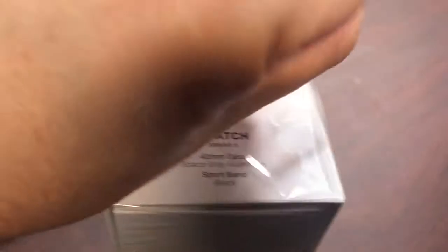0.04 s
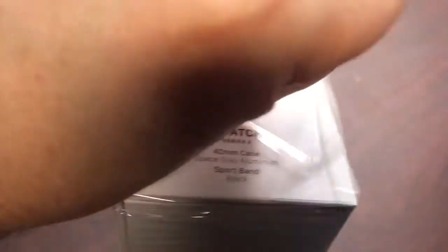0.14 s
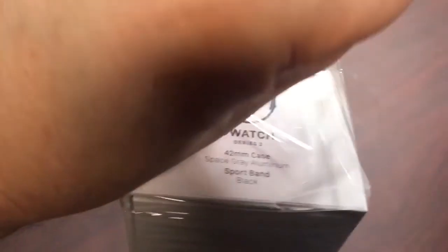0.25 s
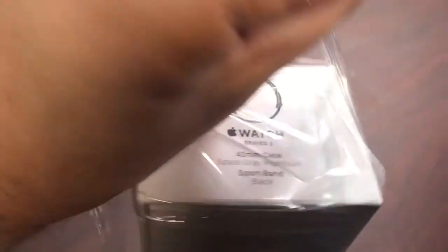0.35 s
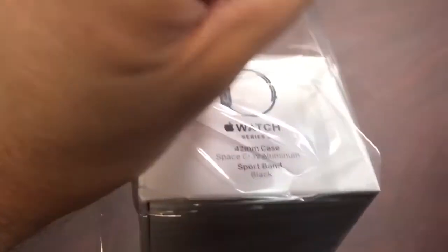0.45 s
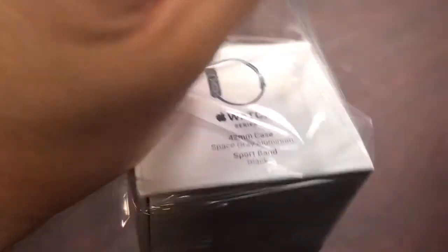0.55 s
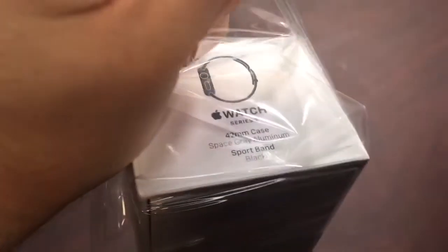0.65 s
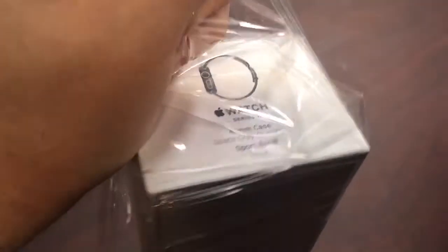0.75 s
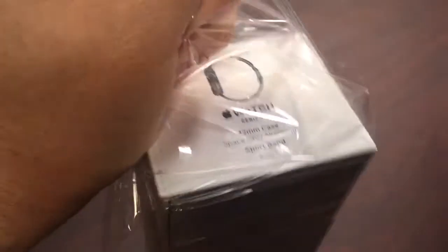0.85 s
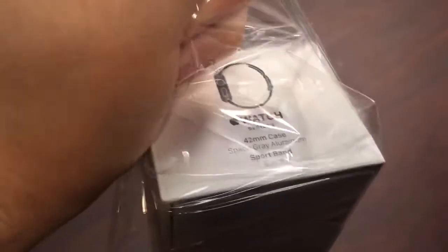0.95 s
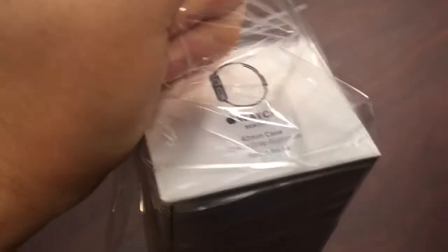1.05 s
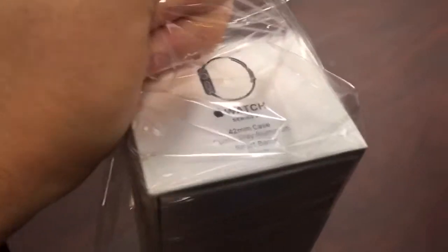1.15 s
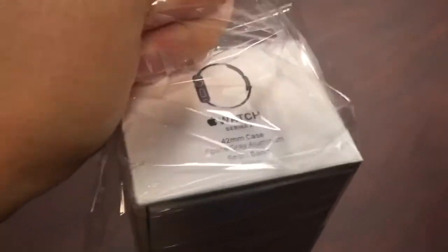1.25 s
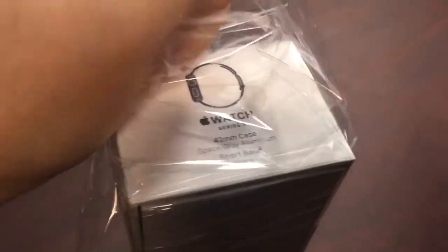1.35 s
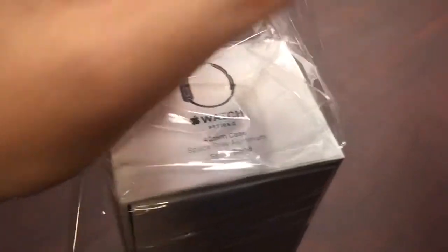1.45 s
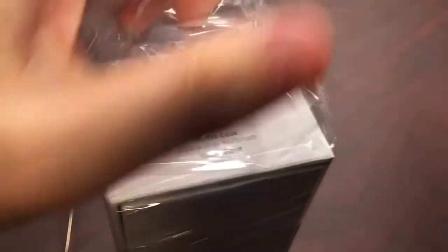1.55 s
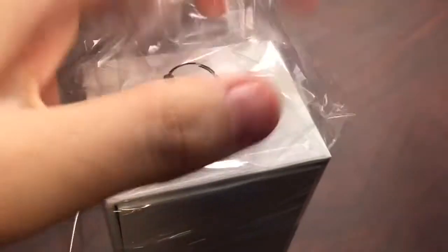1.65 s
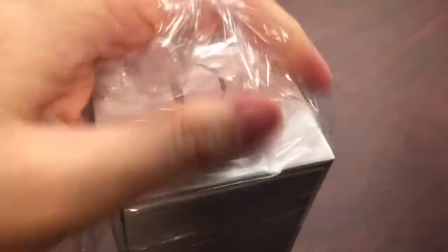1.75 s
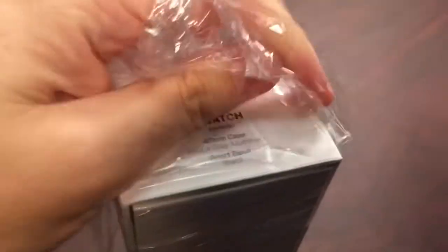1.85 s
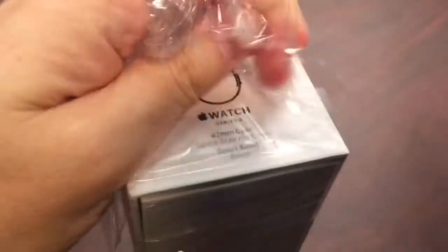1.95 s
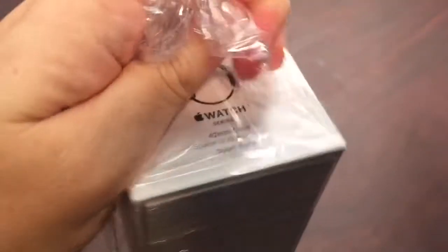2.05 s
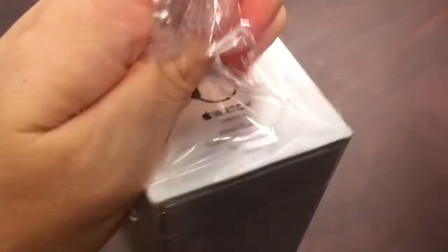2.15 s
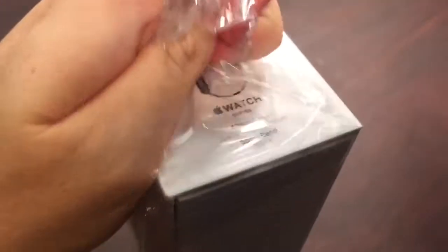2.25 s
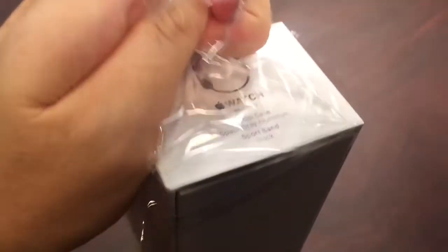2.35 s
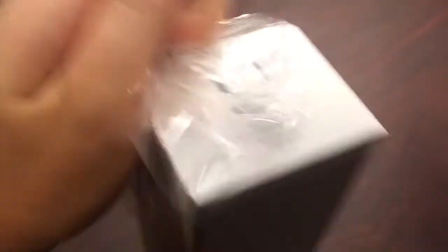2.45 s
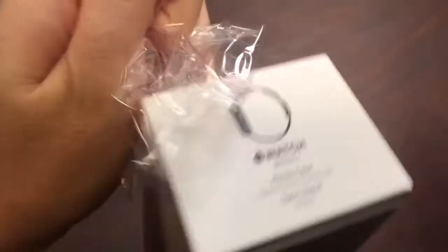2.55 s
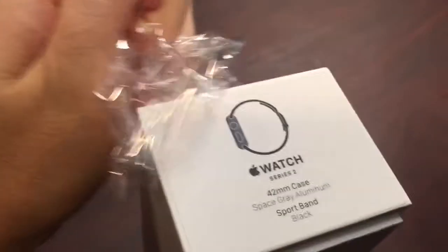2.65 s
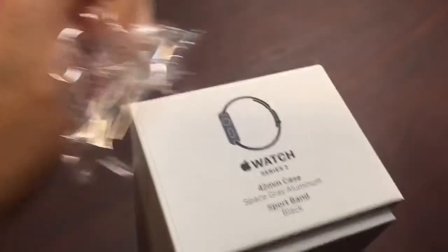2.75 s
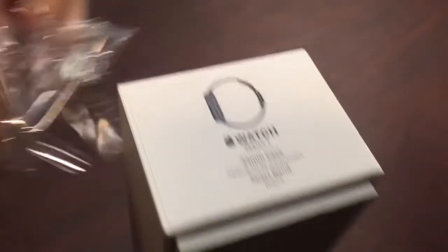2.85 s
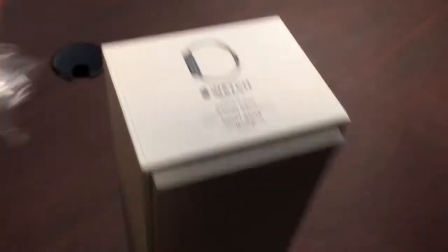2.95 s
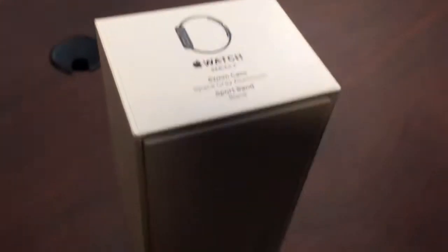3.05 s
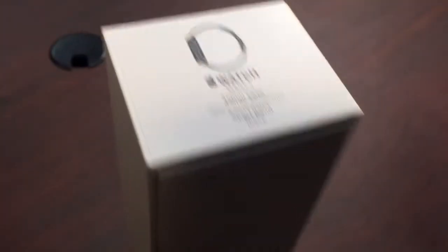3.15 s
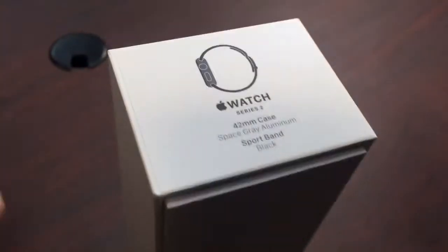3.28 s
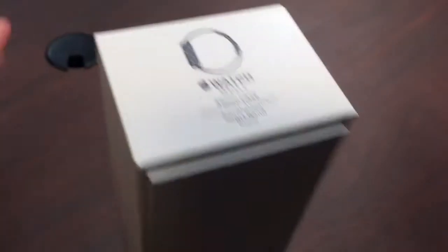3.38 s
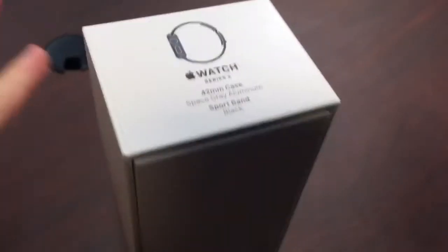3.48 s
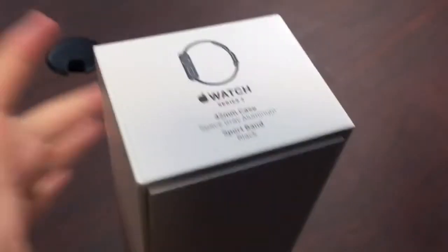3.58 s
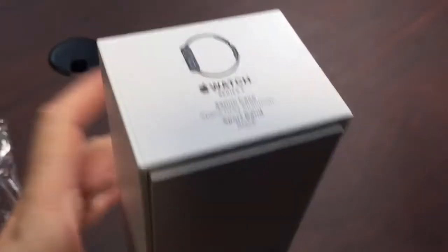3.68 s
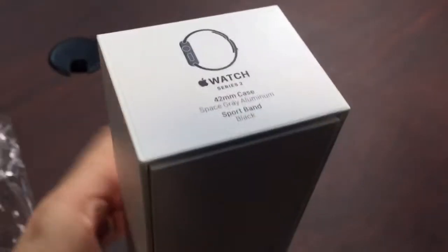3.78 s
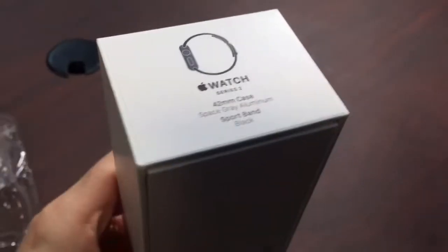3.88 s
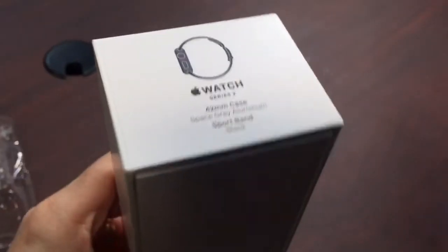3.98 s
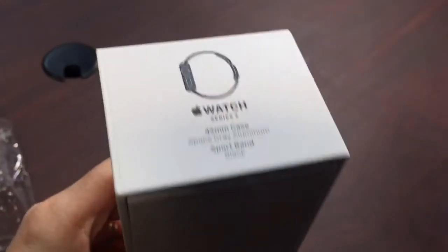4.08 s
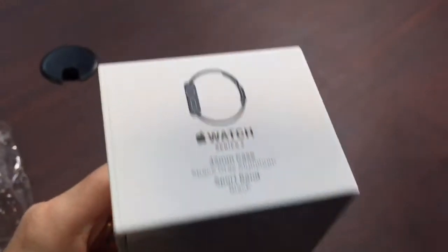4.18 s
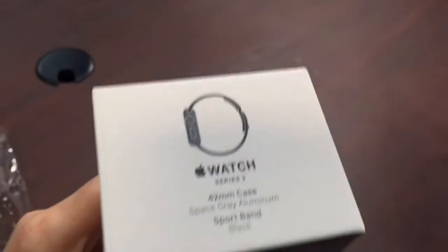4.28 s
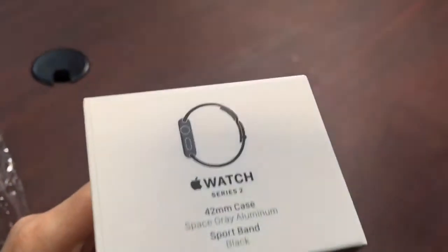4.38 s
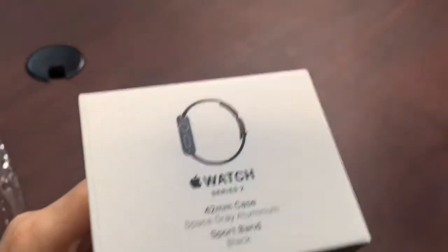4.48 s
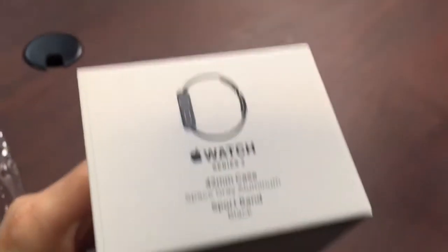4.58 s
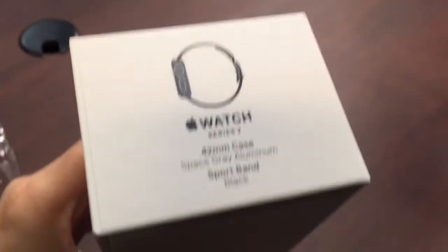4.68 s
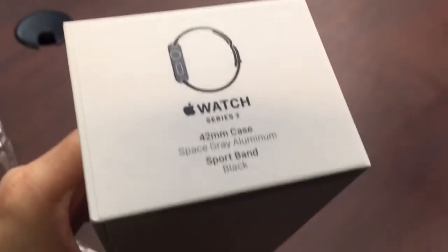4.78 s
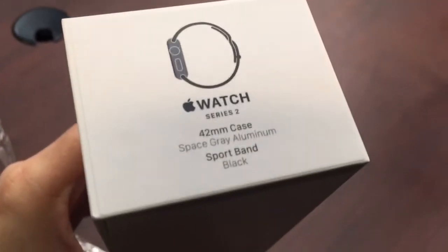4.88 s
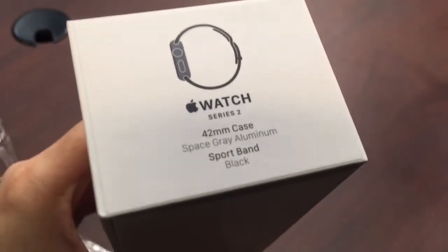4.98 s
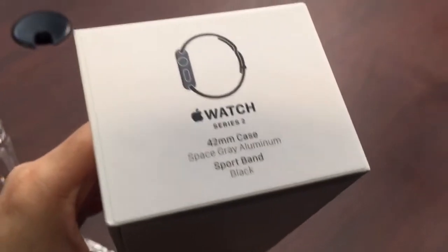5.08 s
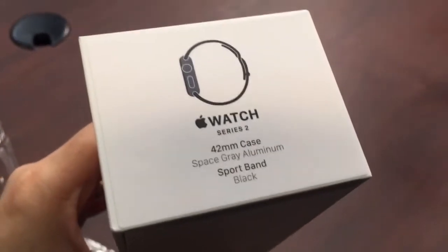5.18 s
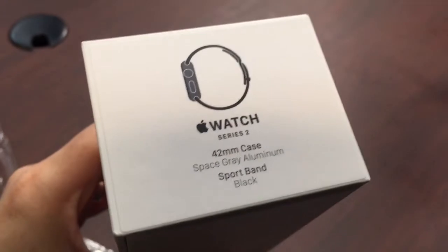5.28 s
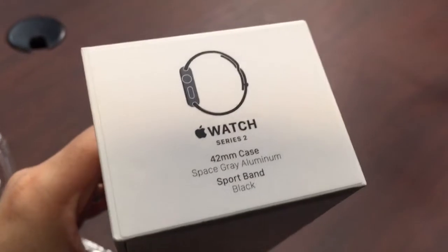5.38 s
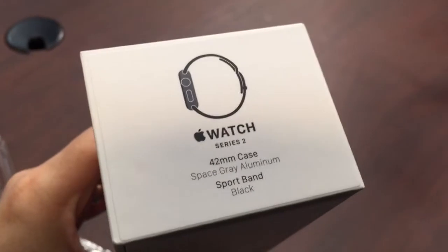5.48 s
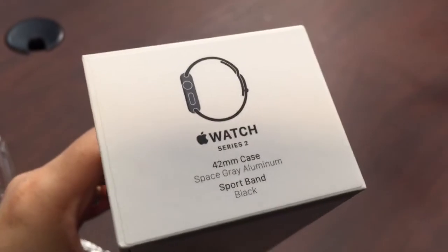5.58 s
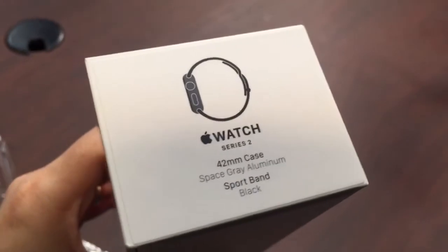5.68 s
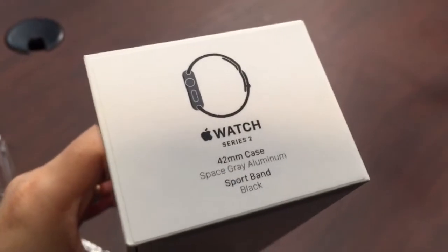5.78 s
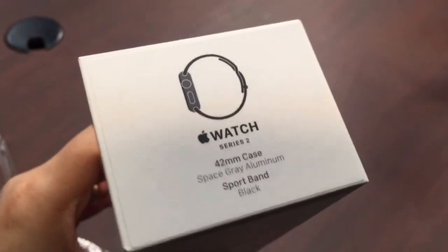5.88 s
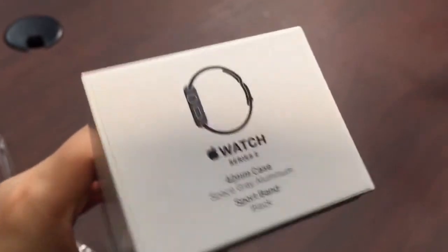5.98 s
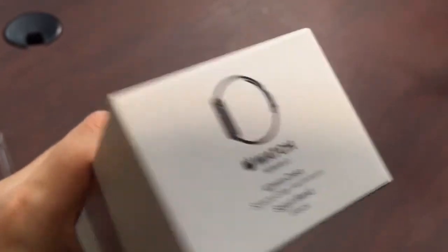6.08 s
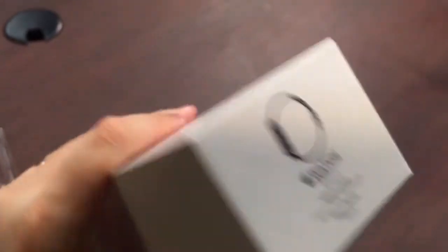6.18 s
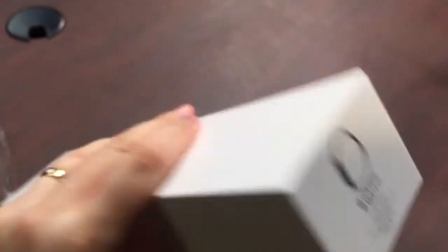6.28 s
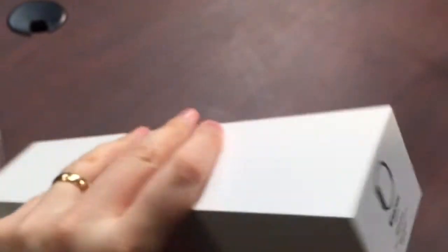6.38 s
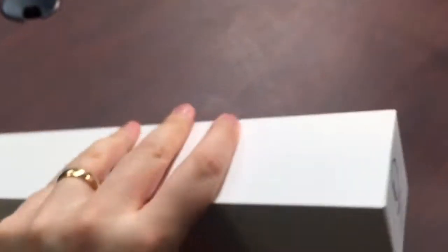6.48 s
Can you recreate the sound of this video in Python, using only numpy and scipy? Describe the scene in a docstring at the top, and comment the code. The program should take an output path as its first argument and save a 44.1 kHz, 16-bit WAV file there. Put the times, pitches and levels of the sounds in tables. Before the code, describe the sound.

Bright bursts of crinkling film and hard little snaps come first, with muffled cardboard thuds beneath. They ease, then intensify until the wrap cracks free with a flap and a low puff. Loose plastic rustles while the box rocks to rest. Near quiet follows, with light finger brushing and faint squeaks over room rumble, then a raspy, juddering slide. Close microphone, small indoor room.

```python
"""In a small, quiet room with ventilation rumble, shrink wrap is peeled off a cardboard box, close by: bursts
of noise snap one by one over fine crinkling made of random grains, while ringing tones give the box's knocks.
The film then lets go with a loud pop: a crack, a flap and a low push of air. Softer snaps follow as the wrap
is put aside and the box rocks to rest on a desk. Light rubbing, ticks and faint squeaks come as a hand takes
the box, and at last it slides across the desk: coloured noise that swells, with scrapes, a rasp and a judder."""
import sys
import numpy as np
from scipy import signal
from scipy.fft import rfft, irfft, next_fast_len
from scipy.io import wavfile
from scipy.ndimage import uniform_filter1d, map_coordinates

SR = 44100
rng = np.random.default_rng(int(sys.argv[2]) if len(sys.argv) > 2 else 0)


def persist_wave(psi):
    """Save psi, clipped to +-1, as 16-bit WAV."""
    counts = np.round(np.clip(psi, -1, 1) * 32767).astype(np.int16)
    wavfile.write(sys.argv[1], SR, np.atleast_2d(counts).T)


N = 287973
LEAD = .004  # time from the start of a burst to its peak (s)


def amp(db):
    """Turn decibels into a gain."""
    return 10 ** (np.asarray(db) / 20)


def unit(x):
    """Scale a sound to an average (rms) strength of 1."""
    return x / np.sqrt(np.mean(x ** 2) + 1e-20)


def along(points, hz):
    """Read a curve of (f/Hz, value) points on a log frequency axis."""
    f, v = np.transpose(points)
    return np.interp(np.log(hz + 1), np.log(f + 1), v)


def wobble(rate):
    """A smooth random curve through `rate` random points a second."""
    return map_coordinates(rng.standard_normal(int(N * rate / SR) + 4), [np.arange(N) * rate / SR])


def add(track, s, sound):
    """Mix a sound into the track at s seconds."""
    part = track[max(round(s * SR), 0):][:len(sound)]
    part += sound[:len(part)]


def click(points, size=1024):
    """The tightest pulse with this (f/Hz, level/dB) colour that does not start early (minimum phase)."""
    cepstrum = irfft(np.log(amp(along(points, np.fft.rfftfreq(size, 1 / SR)))))
    cepstrum[1:size // 2] *= 2
    cepstrum[size // 2 + 1:] = 0
    return irfft(np.exp(rfft(cepstrum)))


def coloured(x, points):
    """Filter a sound to the colour given by (f/Hz, level/dB) points."""
    return signal.fftconvolve(x, click(points, size=8192))[:N]


def shiver(t60, tail_db, lead_db, lead_t60=0.011):
    """Noise swells briefly before a sharp peak at LEAD seconds and flutters briefly after it; total energy 1."""
    t = np.arange(SR // 40) / SR - LEAD
    noise = rng.standard_normal(len(t))
    rise = noise * amp(-60 * np.abs(t) / lead_t60) * (t < 0)
    flutter = noise * amp(-60 * np.abs(t) / t60) * (t > 0)
    rise = amp(lead_db) * rise / np.linalg.norm(rise)
    flutter = amp(tail_db) * flutter / np.linalg.norm(flutter)
    pulse = rise + flutter
    pulse[round(LEAD * SR)] = 1  # the peak itself
    return rng.choice([-1, 1]) * pulse / np.linalg.norm(pulse)


def grains(rate, spread_db):
    """Random impulses of uneven size, about `rate` a second, with a short-term power near 1."""
    size = amp(spread_db * np.minimum(rng.exponential(size=N), 4))
    train = (rng.random(N) < rate / SR) * size * rng.choice([-1, 1], N)
    power = np.abs(uniform_filter1d(uniform_filter1d(train ** 2, size=1100), size=700))
    return train / np.sqrt(power + .05 * power.mean())


def stroke(start, length, attack_s, release_s):
    """Loudness of one hand movement: it rises, holds and dies away after `length` seconds."""
    t = np.arange(N) / SR - start
    return np.clip(t / attack_s, 0, 1) * np.exp(-np.clip((t - length) / release_s, 0, 30))


# colour of the ventilation air: f/Hz, level/dB
AIR_COLOUR = [(15, -44.5), (25, -10), (99, -4), (153, -11.5), (175, -22), (326, -23), (363, -19.5),
              (476, -26.5), (1260, -34), (1700, -33.5), (2160, -36), (2610, -37), (3340, -39), (9840, -47),
              (16000, -51)]
# ventilation hum: f/Hz, level/dB
HUM_TONES = [(360.7, -78)]
AIR_DB = -59


def room_tone(flutter_db=2.0):
    """Ventilation: a rumble that wanders in level, even hiss and a faint, unsteady hum."""
    t = np.arange(N) / SR
    hum = np.zeros(N)
    for hz, db in HUM_TONES:
        level = amp(db + 1.7 * wobble(1.8))
        hum += level * unit(np.sin(2 * np.pi * hz * t + 1.2 * wobble(27)))
    air = unit(coloured(rng.standard_normal(N), AIR_COLOUR))
    low_pass = signal.butter(2, 200, fs=SR, output="sos")
    rumble = signal.sosfiltfilt(low_pass, air)
    hiss = air - rumble
    return amp(AIR_DB) * (hiss + amp(flutter_db * wobble(5.4)) * rumble) + hum


# faint narrow squeaks: start t/s, time to fade by 14 dB t/s (cut off after twice that), f/Hz, level/dB
SQUEAK_NOTES = [(4.52, 0.15, 2650, -71), (4.56, 0.13965, 1470, -68.5), (4.705, .2, 2621, -71.5),
                (4.959, 0.11, 2603, -72), (5.107, 0.09334, 1790, -61), (5.217, .09, 4570, -72),
                (5.745, .14, 2553, -66)]


def squeaks(width_hz=380):
    """Hoarse little tones, each a narrow band of noise, that start quickly and fade."""
    out, t = np.zeros(N), np.arange(N) / SR
    band = wobble(width_hz) + 1j * wobble(width_hz)
    for s, length, hz, db in SQUEAK_NOTES:
        on = (t > s) & (t < s + 2 * length)
        u = t[on] - s
        swell = (1 - np.exp(-u / 0.007906)) * amp(-14 * u / length)
        out[on] += amp(db) * swell * np.real(band[on] * np.exp(2j * np.pi * hz * u))
    return out


# light brushing of skin and film, then two scrapes as the box slides:
# start t/s, length t/s, dry rustle level/dB, mellow hiss level/dB
BRUSH_STROKES = [(3.47, 0.06, -73, -81), (3.561, 0.74, -88, -75), (3.641, 0.043, -65.5, -73),
                 (3.848, 0.101, -59, -77), (4.201, 0.13, -87, -73), (6.122, 0.025905, -52.5, -66),
                 (6.317, 0.11, -57.5, -66.5)]
# colour of light, dry rubbing, also used for ticks and scratches: f/Hz, level/dB
DRY_COLOUR = [(300, -17), (1500, -12), (3300, -3), (5000, -2), (8500, 2.5), (15000, -1.5)]
# colour of fingers on card, also used for scratches: f/Hz, level/dB
SKIN_COLOUR = [(500, -17), (1500, -2), (2300, -10.5), (3300, -2.5), (4300, -12.5), (7000, -29.5),
               (15000, -17)]
BRUSH_ATTACK_S, BRUSH_RELEASE_S = 0.027, 0.006


def brush():
    """Light brushing and two later scrapes: a dry, grainy rustle mixed with a mellower hiss."""
    grainy = grains(rate=1000, spread_db=6.5) + 1.558 * rng.standard_normal(N)
    rustle = unit(coloured(grainy, DRY_COLOUR))
    hiss = unit(coloured(rng.standard_normal(N), SKIN_COLOUR))
    out = np.zeros(N)
    for start, length, rustle_db, hiss_db in BRUSH_STROKES:
        rub = amp(rustle_db) * rustle + amp(hiss_db) * hiss
        out += stroke(start, length, BRUSH_ATTACK_S, BRUSH_RELEASE_S) * rub
    return out


# ways the cardboard box rings, also used for its knocks: f/Hz, level/dB, time to fade by 60 dB t/s
# (knocks retune and shorten the ring by grip, and scatter and trim its level)
BOX_MODES = [(140, -6, 0.11), (208.58, -1.5, .13), (272, -2.5, .08), (351.14, -0.5, .09), (496, -8, .06),
             (610, 2.5, .05), (668.8, 0.5, 0.039), (930, 0.5, 0.023)]
# colour of the box droning as it slides: f/Hz, level/dB
SLIDE_COLOUR = [(29, -34), (50, -20), (70, -20), (131, -0.5), (166, -8.5), (248, -9.5), (309, 1), (418, -6),
                (588, -4), (649, -9), (950, -15.5), (1030, -28), (3220, -28), (3710, -33), (6000, -37.5),
                (7800, -63.5), (13200, -120)]
# colour of the judder: f/Hz, level/dB
JUDDER_COLOUR = [(30, -28), (85, -16), (140, -5), (210, -11.5), (400, -36), (1500, -82)]
# the box is pushed across the desk and gathers speed
SLIDE_START_S, SLIDE_RISE_S, UNEVEN_DB = 6.018, 0.18347, .5
SLIDE_DB, SCRATCH_DB = -39, -64  # levels at full speed
RASP_DB, RASP_GROWS = -47.5, 2.9  # level at full speed; power of speed
JUDDER_DB, JUDDER_GROWS = -40, 4.2  # level at full speed; power of speed


def slide():
    """Tiny slips of the box on the desk drone in its hollow; its edge scratches, rasps and judders."""
    speed = 1 - np.exp(-np.maximum(np.arange(N) / SR - SLIDE_START_S, 0) / SLIDE_RISE_S)
    speed = speed * amp(UNEVEN_DB * wobble(14))
    slips = grains(rate=1500, spread_db=2) + rng.standard_normal(N)
    t = np.arange(SR // 4) / SR
    ring = sum(amp(db - 60 * t / t60) * np.sin(2 * np.pi * hz * t) for hz, db, t60 in BOX_MODES)
    hollow = unit(signal.fftconvolve(rng.standard_normal(N), ring)[:N])
    body = unit(coloured(slips, SLIDE_COLOUR)) + amp(-14.5) * hollow
    scratch = unit(coloured(slips, DRY_COLOUR)) + amp(-4.5) * unit(coloured(slips, SKIN_COLOUR))
    # sliding faster makes the rub rasp in the middle of the range
    rasp_colour = [(300, -17), (900, 5), (1500, 1), (3200, -23), (6000, -24)]
    rasp = unit(coloured(grains(rate=1100, spread_db=3.0), rasp_colour))
    rasp = amp(RASP_DB) * speed ** RASP_GROWS * rasp
    judder = unit(coloured(rng.standard_normal(N), JUDDER_COLOUR))
    judder = amp(JUDDER_DB) * speed ** JUDDER_GROWS * judder
    rub = amp(SLIDE_DB) * unit(body) + amp(SCRATCH_DB) * unit(scratch)
    return judder + speed * rub + rasp


# knocks of the box, from snapping film or from bumps on the desk: t/s, box level/dB (before scatter
# and trim), low tone level/dB, contact softness f/Hz (higher is harder), grip of the hand 0-1
BOX_KNOCKS = [(.028, -37, -42.5, 400, 0.64), (0.099, -27, -60, 324.6, 0.82), (.286, -29.5, -63, 800, 0.99),
              (.32, -20, -56, 900, 0.96), (0.637, -31.5, -63, 400, .8), (1.401, -40, -44, 500, 0.75),
              (2.002, -38, -61, 503, 0.19), (2.537, -37.5, -45, 248.5, .1), (2.713, -39, -59.5, 1093, 0.74),
              (2.782, -43, -65.5, 1100, .65), (3.04, -32, -48, 464, .4), (3.261, -43, -37, 500, 0.14),
              (3.375, -51, -53, 400, 0), (3.501, -38, -47, 369.6, 0.21), (3.648, -46.5, -40.5, 519.4, 0.4),
              (3.802, -47, -43, 384, 0.2)]
LOW_T60 = .18  # the low tone fades by 60 dB in this time (s)
# pitch ratio of the free box; a full grip adds to it and takes this share of the ring time
FREE_TUNING, GRIP_STIFFENS, GRIP_DAMPS = .87, 0.29, 0.96


def knocks(low_hz=87, delay_cycles=0.44):
    """Each knock rings the hollow box, retuned and damped by the grip, together with one low tone."""
    out, t = np.zeros(N), np.arange(SR // 2) / SR
    for s, box_db, low_db, soft_hz, grip in BOX_KNOCKS:
        tuning = FREE_TUNING + GRIP_STIFFENS * grip
        freedom = max(1 - GRIP_DAMPS * grip, .1)
        for mode_hz, db, t60 in BOX_MODES:
            hz = mode_hz * tuning
            # a soft contact hardly reaches the upper modes; low modes take longer to build up
            size = amp(box_db + db + rng.normal(0, 1.1) + 1.0) / (1 + (hz / soft_hz) ** 4)
            swell = 1 - np.exp(-t * hz / delay_cycles)
            fade = amp(-60 * t / (t60 * freedom))
            add(out, s, size * swell * fade * np.sin(2 * np.pi * (hz * t + rng.random())))
        add(out, s, amp(low_db - 60 * t / LOW_T60) * np.sin(2 * np.pi * low_hz * t))
    return out


# the film slips off the last corner: t/s, crack level/dB, air push level/dB
FILM_POPS = [(2.5334, 15.5, -18.5)]
# colour of the crack: f/Hz, level/dB
CRACK_COLOUR = [(30, -19), (100, -1.5), (170, 6), (280, 3.5), (480, 1.5), (900, 0), (1400, 1.5), (2400, 2),
                (3200, -4.5), (4200, 1.5), (5800, -10.5), (8200, -0.5), (15000, -7.5)]
# colour of tight creases, also used for crinkling: f/Hz, level/dB
TIGHT_COLOUR = [(100, -41.5), (300, -31.5), (1500, -11.5), (3300, 4), (4200, 2), (5000, 0.5), (6800, -1.5),
                (9000, -0.5), (12500, -3), (16000, -4)]
# colour of slack folds, also used for crinkling: f/Hz, level/dB
SLACK_COLOUR = [(20, -48.5), (70, -18.5), (150, -3.5), (300, -2.5), (550, -6), (850, -2.5), (1500, 1.5),
                (2500, 4), (3400, 1.5), (6000, -23), (16000, -52)]


def pop(push_hz=90, push_t60=0.036, flap_db=-7):
    """The taut film cracks free, slaps the box and shoves the air like a drumhead."""
    out, t = np.zeros(N), np.arange(SR // 4) / SR
    for s, crack_db, push_db in FILM_POPS:
        crack = shiver(t60=.003, tail_db=3, lead_db=-8, lead_t60=.0015)
        flap = shiver(t60=.011, tail_db=8, lead_db=-6)
        flap_colour = click(SLACK_COLOUR) + 0.47 * click(TIGHT_COLOUR)
        push = amp(push_db - 60 * t / push_t60) * np.sin(2 * np.pi * push_hz * t)
        add(out, s - LEAD, amp(crack_db) * np.convolve(click(CRACK_COLOUR), crack))
        add(out, s + .0015 - LEAD, amp(crack_db + flap_db) * np.convolve(flap_colour, flap))
        add(out, s + 0.0024, push)
    return out


# each pull or squeeze of the film, which also times the lesser snaps: start t/s, length t/s,
# level/dB (before the crinkle's trim), large slack folds relative to it level/dB
FILM_PULLS = [(-0.02, 0.032, -37, -3), (0.08, 0.063, -38.5, -6.5), (0.162, 0.11, -38, -2),
              (0.272, 0.042, -32.5, 0), (0.385, 0.3075, -45.5, -2.5), (0.762, 0.19, -49, 0.5),
              (1.024, 0.079, -50.5, 3.5), (1.195, 0.047, -59, -0.5), (1.256, 0.1186, -46, -4),
              (1.383, 0.089, -41.5, -2.5), (1.465, 0.062, -37, -3), (1.532, 0.091, -44.5, -3),
              (1.65, 0.066, -46.5, -4), (1.72, 0.06, -41, -2), (1.777, 0.14101, -32.5, -5),
              (1.972, 0.097, -34.5, -4), (2.08, 0.075, -42, -6.5), (2.15, 0.21, -35, -5),
              (2.37, 0.16, -35.5, -6.5), (2.499, 0.098, -35, -8.5), (2.602, 0.088, -44.5, -4),
              (2.753, 0.15, -56, -5), (2.87, 0.087, -60, -4), (2.938, 0.18, -47, -3.5),
              (3.169, 0.078, -53, -5), (3.236, 0.098, -50.5, -4.5), (3.334, 0.037, -42.5, -6),
              (3.383, 0.09687, -53, -3)]
PULL_ATTACK_S, PULL_RELEASE_S = 0.016, 0.022  # the hand takes up the film, and stops
SETTLE_DB, SETTLE_S = -8.5, 0.052  # crumpled film goes on creaking after the hand stops


def crinkling():
    """Gains of tight creases and slack folds: every pull stirs the film, which then settles."""
    tight, slack = np.zeros(N), np.zeros(N)
    for start, length, db, slack_db in FILM_PULLS:
        stirred = stroke(start, length, PULL_ATTACK_S, PULL_RELEASE_S)
        settling = amp(SETTLE_DB) * stroke(start, length, PULL_ATTACK_S, SETTLE_S)
        pull = np.maximum(stirred, settling)
        tight += (amp(db) * pull) ** 2
        slack += (amp(db + slack_db) * pull) ** 2
    return np.sqrt(tight), np.sqrt(slack)


def crinkle(tight_gain, slack_gain, count=14):
    """Many small creases, on patches of film that each ring in their own way, over the hiss of film on card."""
    creases = grains(rate=1100, spread_db=6)
    patch = rng.integers(count, size=N)
    tight, slack = np.zeros(N), np.zeros(N)
    for k, lean in enumerate(np.linspace(-1, 1, count)):
        ring = shiver(t60=.0015, tail_db=2, lead_db=-4, lead_t60=.002)
        rung = signal.oaconvolve(creases * (patch == k), ring)[:N]
        # each patch leans towards tight creases or slack folds
        tight += amp(-3 * lean) * rung
        slack += amp(4.5 * lean) * rung
    tight = unit(tight) + amp(-10) * rng.standard_normal(N)
    slack = unit(slack) + amp(-6) * rng.standard_normal(N)
    tight = unit(coloured(tight, TIGHT_COLOUR))
    slack = unit(coloured(slack, SLACK_COLOUR))
    return amp(-1.0) * tight_gain * tight + amp(-1.02) * slack_gain * slack


# chances for a lesser snap, heard only during a pull; levels are before the trim of all snaps
LESSER_PER_S, LESSER_DB, LESSER_SCATTER_DB = 32, -18, 2
LESSER_GROWS, USUAL_CRINKLE_DB = .4, -42.5  # dB of snap per dB of crinkling above its usual level
LOOSE_DB = -8  # once off the box, the film is slack and its lesser snaps are softer
LESSER_HZ, LESSER_PANEL_DB, PANEL_SCATTER_DB, LESSER_FIZZ_DB = 2800, 3.5, 3, -1


def lesser_snaps(stir, count=200):
    """Rows like the loud snaps, for small creases that give way at random while the film is pulled."""
    times = (np.arange(count) + rng.random(count)) / LESSER_PER_S
    scatter = np.clip(rng.standard_normal((count, 3)), -2, 2)
    rows = []
    for s, (size, pitch, panel) in zip(times, scatter):
        if any(start < s < start + length for start, length, *_ in FILM_PULLS):
            above_db = 20 * np.log10(stir[int(s * SR)] + 1e-9) - USUAL_CRINKLE_DB
            db = LESSER_DB + LESSER_GROWS * above_db + LESSER_SCATTER_DB * size
            db += LOOSE_DB * (s > FILM_POPS[0][0])
            hz = min(LESSER_HZ * np.exp(.22 * pitch), 4500)
            rows.append((s, db, hz, LESSER_PANEL_DB + PANEL_SCATTER_DB * panel, LESSER_FIZZ_DB))
    return rows


# the loudest creases that snap through: t/s, level/dB (before the trim of all snaps),
# pitch of the flexing panel f/Hz, panel level/dB, fizz level/dB
LOUD_SNAPS = [(0.0943, -15, 3990, 6.5, 2), (0.1037, -14.5, 3440, 12.5, 5.5),
              (0.1087, -8.5, 4400, 2.5, -6.5), (0.1398, -9.5, 2110, 11, 6), (0.1865, -18.5, 2560, 21, 0),
              (0.2159, -12, 2570, -2, -2.5), (0.2898, -7.5, 2230, 16.5, -8), (0.3222, -1.5, 1820, 5.5, 0.5),
              (0.3295, -8, 2240, 5.5, 0), (0.3446, -8, 3000, 5, 3), (0.3735, -10.5, 1520, 8, 10.5),
              (0.4198, -12, 3200, 1.5, 4), (0.4512, -4, 3400, -11, -6), (0.4605, -8, 3000, -1, 1),
              (0.482, -17.5, 2220, 13, 12), (0.5176, -20, 1911, 14.5, -11), (0.5543, -10, 3330, 9.5, -15.5),
              (0.5882, -12, 3200, 7, 2), (0.6385, 0, 2800, 6.5, 1), (0.6644, -16, 2700, -3, -9),
              (0.6831, -6, 3900, -3, -9), (0.6896, -1.5, 4020, 0, -7), (0.7049, -14, 2180, 16.5, -10),
              (0.7416, -12, 4100, 12.5, -8.5), (0.7944, -14, 2200, -5, 6), (0.7991, -10, 3150, 4.5, -8),
              (0.8134, -16.5, 2320, 6, -3), (0.8412, -17.5, 3000, 10, 2), (0.8916, -20, 3200, 7, 11),
              (0.9025, -10, 2230, 7, -11), (1.0122, -15, 3930, 3, 5), (1.0509, -12.5, 3800, 0, 4),
              (1.0685, -9.5, 3300, -1.5, 5), (1.0727, -13, 2250, -2, 10), (1.1182, -10.5, 4100, -0.5, 7),
              (1.1239, -21, 2930, 12, -12), (1.1871, -17.5, 2420, 10, -22), (1.2253, -20, 3800, -4, 0),
              (1.2454, -18, 2563, 7, 4.5), (1.2613, -6, 3100, -7, -13), (1.2796, -15, 3700, 2, -8.5),
              (1.2991, -11, 3340, -7, -3), (1.3698, -2.5, 1692, 9, 0), (1.4113, -14.5, 1900, 7, 2),
              (1.4321, -5, 3700, -16.5, -7), (1.487, -16, 2600, 7, 8.5), (1.5129, -17, 2105, 14, -12),
              (1.5931, -12, 1270, 7.5, -3), (1.7395, -8.5, 4480, 5, 5), (1.8159, 9.5, 3800, -7.5, -13),
              (1.8708, -0.5, 1490, -1.5, -2), (1.9855, -10.5, 3743, 6.5, -10), (1.9956, -1.5, 3620, 0, -5),
              (2.0415, -1.5, 3100, 5, 9), (2.0559, -1, 3140, 6, -1), (2.3116, -8, 4200, 1, 9),
              (2.3395, -4.5, 4300, 4, 4), (2.3637, 1.5, 3100, -6, -9), (2.3983, -1.5, 4000, -8, 1.5),
              (2.4889, 1.5, 1700, -4, 2), (2.7387, -1.5, 2780, -11.5, -16), (2.8403, -15.5, 2400, 2.5, 3),
              (2.8781, -25, 2120, 10, -16.5), (2.9691, -15.5, 2930, 1, -13.5),
              (2.9799, -10.5, 4400, -2.5, -18), (3.0964, -17.5, 3320, 9.5, -14.5), (3.11, -28, 3100, 10, 7),
              (3.129, -22.5, 3070, 12.5, -3), (3.2616, -18, 1690, 9, 0), (3.4316, -30, 2030, 19.5, 11),
              (3.5398, -34, 1900, 12.5, 7)]
# light finger ticks: t/s, level/dB (before the trim of all snaps)
FINGER_TICKS = [(4.008, -41.5), (4.05, -41.5), (4.156, -44), (4.229, -39.5), (4.583, -41.5)]


def snaps(stir):
    """Each crease buckles in an instant and flexes a panel of film, which radiates little below its own pitch."""
    out = np.zeros(N)
    for s, db in FINGER_TICKS:
        tick = shiver(t60=0.005355, tail_db=-7.5, lead_db=-10.5)
        add(out, s - LEAD, amp(db) * np.convolve(click(DRY_COLOUR), tick))
    for s, db, hz, panel_db, fizz_db in list(LOUD_SNAPS) + lesser_snaps(stir):
        colour = [(40, panel_db - 41.0), (hz / 7, panel_db - 13.5), (hz * .4, panel_db - 10.5),
                  (hz * 0.79, panel_db), (hz * 1.28, panel_db - 0.5),
                  (min(hz * 1.7, 5700), min(panel_db, 0) + 2.5),
                  (7800, 1), (12500, fizz_db), (16000, fizz_db - 3.0)]
        burst = shiver(t60=.002, tail_db=-4, lead_db=-6, lead_t60=.002)
        add(out, s - LEAD, amp(db) * np.convolve(click(colour), burst))
    return out * amp(-0.4)  # trim of all snaps and ticks


# how long the room rings: f/Hz, time to fade by 60 dB t/s
ROOM_DECAY = [(100, .35), (500, .3), (2500, 0.53), (8000, 0.39), (16000, 0.12)]


def room(x, near_db, tail_db, count=8):
    """Quick echoes off box, hand and desk, and the room's tail; both are drawn anew `count` times a second."""
    out, t = np.zeros(N), np.arange(SR // 3) / SR
    for start in range(0, N, SR // count):
        hz, frames, z = signal.stft(rng.standard_normal(len(t)), SR, nperseg=256)
        fade = amp(-60 * frames / along(ROOM_DECAY, hz)[:, None])
        tail = signal.istft(z * fade, SR, nperseg=256)[1][:len(t)] * (t > .005)
        sparse = rng.standard_normal(len(t)) * (rng.random(len(t)) < .06)
        near = sparse * amp(-60 * t / 0.018) * (t > .001)
        answer = amp(tail_db) * tail / np.linalg.norm(tail) + amp(near_db) * near / np.linalg.norm(near)
        add(out, start / SR, signal.fftconvolve(x[start:start + SR // count], answer))
    return out


def scene():
    """Film and box close by, in the room."""
    tight_gain, slack_gain = crinkling()
    background = room_tone() + squeaks()
    near = brush() + slide() + knocks() + pop() + crinkle(tight_gain, slack_gain) + snaps(tight_gain)
    return (near + room(near, near_db=-9.0, tail_db=-14) + background)[None]


# how strongly the microphone hears each pitch: f/Hz, level/dB
MICROPHONE_RESPONSE = [(15, -31), (28, -12.5), (50, -0.5), (4200, -0.5), (4900, -2), (5800, 0.5), (9300, 0),
                       (10400, -2.5), (11400, 0.5), (15000, 1.5)]
TOP_HZ = 15900  # the sound ends steeply near here


def record(dry):
    """Peaks are rounded off, the microphone loses deep bass and dips in the treble; the sound ends near 15.9 kHz."""
    size = next_fast_len(N + SR // 2)
    hz = np.fft.rfftfreq(size, 1 / SR)
    rounded = dry / (1 + (dry / .8) ** 4) ** .25
    top_edge = np.clip((TOP_HZ - hz) / 200 + .5, 0, 1)
    response = amp(along(MICROPHONE_RESPONSE, hz)) * top_edge
    return irfft(rfft(rounded, size) * response, size)[:, :N]


dry = scene()
out = record(dry)
persist_wave(out)
```